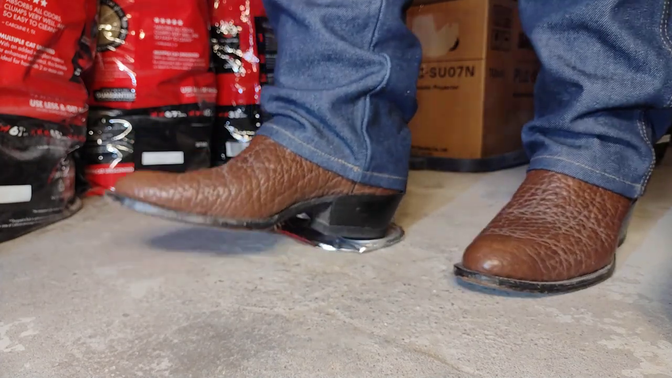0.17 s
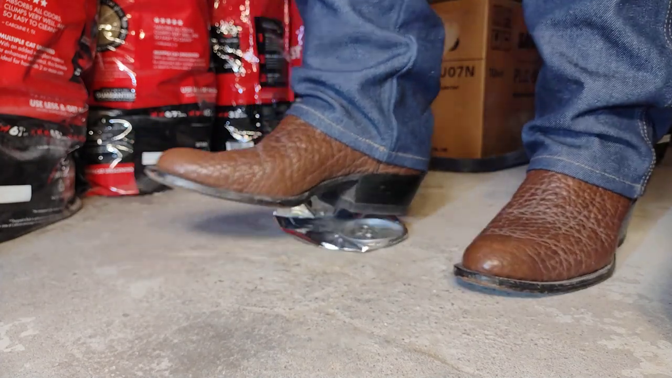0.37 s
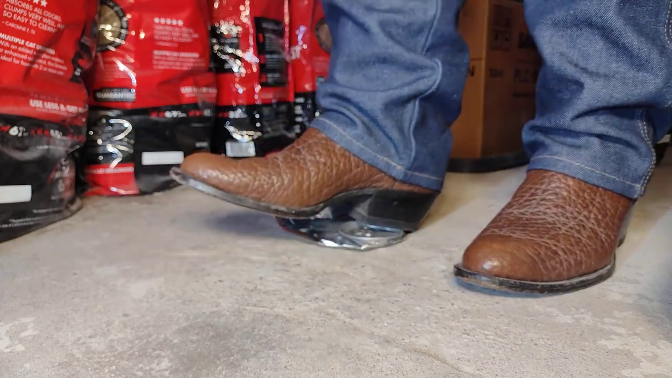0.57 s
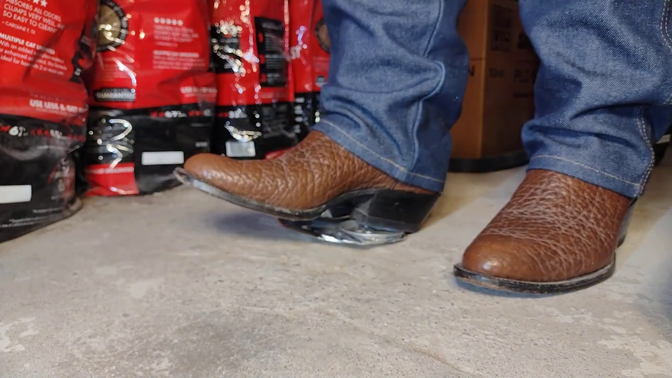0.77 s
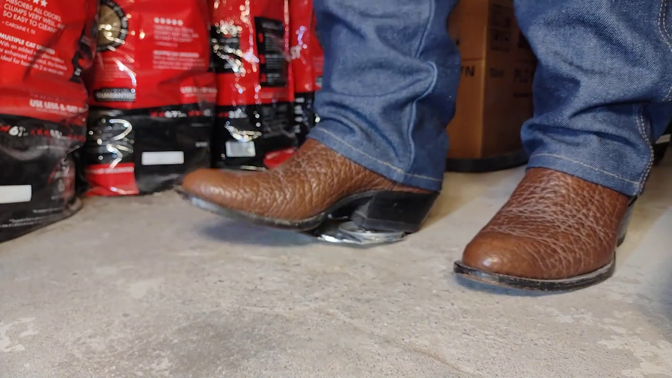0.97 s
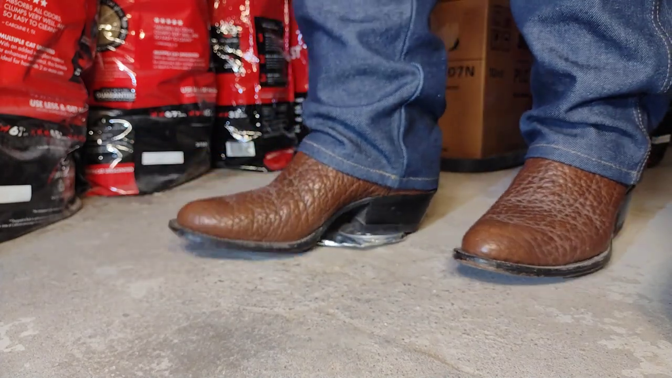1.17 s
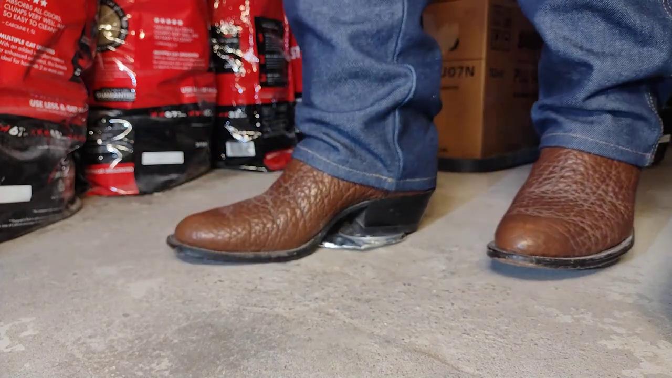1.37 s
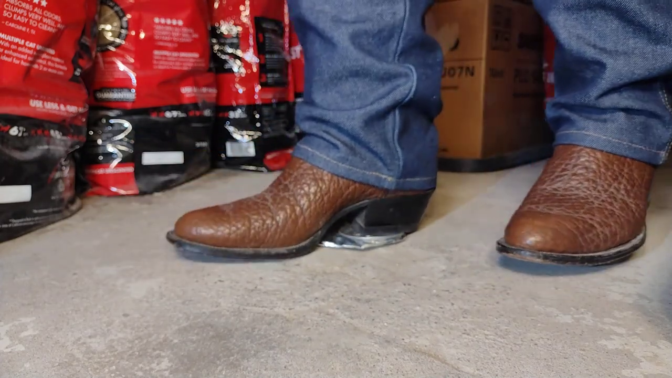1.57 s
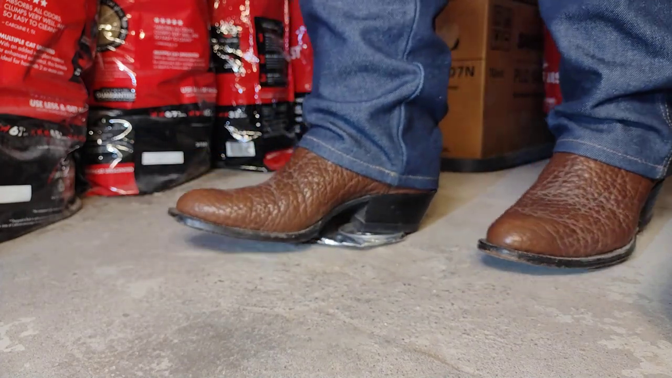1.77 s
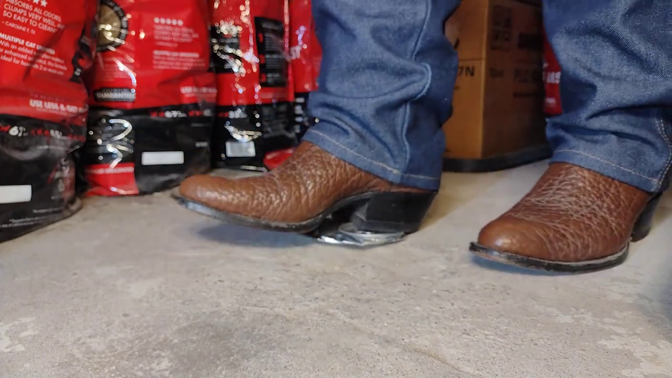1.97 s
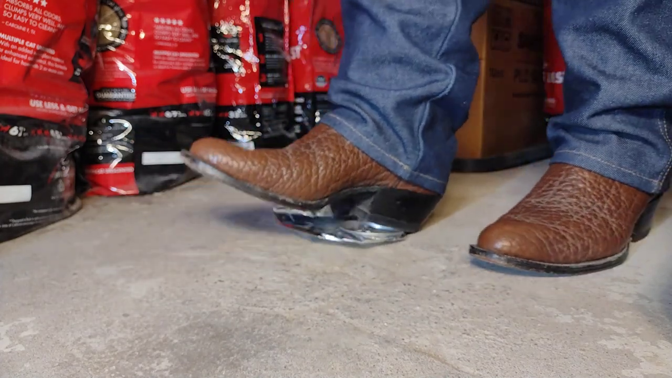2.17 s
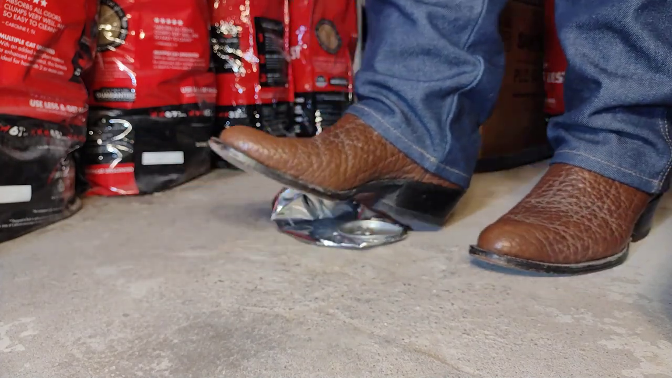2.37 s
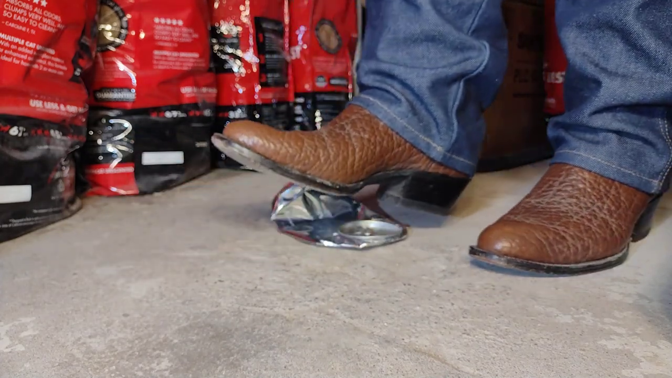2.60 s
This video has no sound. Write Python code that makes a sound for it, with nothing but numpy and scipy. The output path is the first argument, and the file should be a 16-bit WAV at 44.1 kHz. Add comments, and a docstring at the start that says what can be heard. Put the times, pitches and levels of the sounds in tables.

```python
"""A boot heel crushes a thin metal can on a concrete floor, in a small hard-walled room.
Over faint room tone a first buckle cracks, small folds crinkle and the heel bumps dully: shaped noise.
More buckles follow, short noise cracks ringing the crumpled sheet, and the can grinds on the concrete.
From 0.63 s denser bursts come, where panels also pop through with hollow notes: decaying sines.
Crinkle, grinding and bumps swell and fade under and between the bursts; a last faint buckle is at 2.67 s."""
import sys
import numpy as np
from scipy import signal
from scipy.fft import rfft, irfft, next_fast_len
from scipy.io import wavfile
from scipy.ndimage import map_coordinates

SR = 44100
rng = np.random.default_rng(int(sys.argv[2]) if len(sys.argv) > 2 else 0)


def generate_wav(sig):
    """Save sig (samples, or channels by samples) to the path in sys.argv[1] as 16-bit PCM at SR."""
    pcm = np.round(np.clip(np.atleast_2d(sig).T, -1, 1) * 32767).astype(np.int16)
    wavfile.write(sys.argv[1], SR, pcm)


N = 119070
SIZE = 16384  # samples per event
T, F = np.arange(SIZE) / SR, np.fft.rfftfreq(SIZE, 1 / SR)  # s, Hz
CRACK_T60_S = 0.012

# left-right correlation of the direct sound: (frequency [Hz], correlation [-1..1])
DIRECT_CORRELATION = [(510, 0.91), (610, -0.2), (1200, 0.83), (3000, 0.34), (9000, 0.14)]
# left-right correlation of the room sound: (frequency [Hz], correlation [-1..1])
ROOM_CORRELATION = [(150, 0.56), (490, 0.85), (620, 0.37), (1200, 0.29), (9000, -0.34)]


def amp(db):
    """Decibels to gain."""
    return 10 ** (np.asarray(db) / 20)


def along(points, hz):
    """Interpolate (Hz, value) points on a log-frequency axis."""
    point_hz, value = np.transpose(points)
    return np.interp(np.log(hz + 1), np.log(point_hz + 1), value)


def fade(t, t60):
    """Exponential decay, -60 dB at t60."""
    return 1000. ** (-t / t60)


def unit(x):
    """Scale to energy 1, averaged over the channels."""
    return x / np.sqrt(np.mean(np.sum(x ** 2, -1)) + 1e-20)


def flat_power(gain):
    """Scale a gain curve to mean power 1 over frequency."""
    return gain / np.sqrt(np.mean(gain ** 2))


def causal(gain):
    """Minimum-phase response with this gain, by folding the cepstrum."""
    cepstrum = irfft(np.log(np.maximum(gain, 1e-6)))
    cepstrum[1:SIZE // 2] *= 2
    cepstrum[SIZE // 2 + 1:] = 0
    return np.exp(rfft(cepstrum))


def pair(correlation, size=SIZE):
    """Stereo white noise with a given left-right correlation: cos(2 * turn) from mid and side."""
    hz = np.fft.rfftfreq(size, 1 / SR)
    turn = np.arccos(np.clip(along(correlation, hz), -1, 1)) / 2
    spectra = rfft(rng.standard_normal((2, size)))
    mid, side = irfft(spectra * [np.cos(turn), np.sin(turn)], size)
    return np.array([mid + side, mid - side])


def room():
    """Fresh room tail of noise, decaying at a rate set per frequency."""
    # reverberation: (frequency [Hz], t60 [s])
    room_t60 = [(400, 0.16), (2000, 0.17), (15000, 0.165)]
    hz, t, bins = signal.stft(pair(ROOM_CORRELATION), SR, nperseg=256)
    decayed = bins * fade(t, along(room_t60, hz)[:, None])
    tail = signal.istft(decayed, SR, nperseg=256)[1][:, :SIZE]
    return unit(tail * (1 - np.exp(-T / 0.008)))  # 8 ms build-up


def add(out, s, sound):
    """Mix a sound in at time s."""
    i = max(round(s * SR), 0)
    out[:, i:i + SIZE] += sound[..., :N - i]


def can_gain():
    """Broad radiation of the can plus its lasting resonances, at mean power 1."""
    # broad radiation of the sheet: (frequency [Hz], gain [dB])
    sheet = [(25, -56), (70, -33), (190, -30.5), (260, -7.5), (500, -13), (980, -7), (1170, -2.5),
             (1700, -3), (2400, -7.5), (3100, -4), (4500, -10.5), (8000, -16), (13000, -26.5), (16000, -31)]
    # resonances of can and floor: (frequency [Hz], half-power width [Hz], power over the sheet [dB])
    body = [(358.4, 20, 3), (466, 21, 12.5), (521, 37, 15), (586, 38, 4), (716.3, 16.4, 13),
            (1182.5, 28, 7), (1944, 26, 7.5)]
    peaks = sum(amp(db) ** 2 / (1 + (2 * (F - hz) / width) ** 2) for hz, width, db in body)
    return flat_power(amp(along(sheet, F)) * np.sqrt(1 + peaks))


def creases():
    """Random resonances of the sheet in its present shape, at mean power 1."""
    width_hz, depth_db = 110, 3  # each new crease shifts the resonances
    ripple = map_coordinates(rng.standard_normal(SIZE // 2), [F / width_hz])
    return flat_power(amp(depth_db * ripple))


def grains(levels, per_s, colour):
    """Many tiny catches at random moments ring the can and the room."""
    spread_db, room_db = 7, -3.5
    s, db = np.transpose(levels)
    hits = (rng.random(N) < per_s / SR) * rng.choice([-1, 1], N)
    grit = hits * amp(spread_db * rng.standard_normal(N))
    grit = grit / grit.std() * amp(np.interp(np.arange(N) / SR, s, db))
    ring = unit(pair(DIRECT_CORRELATION) * fade(T, CRACK_T60_S)) + amp(room_db) * room()
    answer = unit(irfft(rfft(ring) * causal(can_gain() * amp(along(colour, F)))))
    return signal.fftconvolve(grit[None], answer, axes=1)[:, :N]


def room_tone():
    """Faint steady air of the room: coloured noise."""
    # colour of the air: (frequency [Hz], gain [dB])
    air_colour = [(25, -25.5), (80, 8.5), (200, 0), (600, -8.5), (16000, -11.5)]
    level_db = -64
    hz = np.fft.rfftfreq(N, 1 / SR)
    air = irfft(rfft(pair(ROOM_CORRELATION, size=N)) * amp(along(air_colour, hz)), N)
    return amp(level_db) * air / air.std()


def buckles():
    """Each buckle of the wall cracks, rings briefly under the boot and echoes in the room."""
    # buckles: (time [s], level before all_db [dB], bass, treble, top [dB re level])
    buckle_table = [(0.001, -31, 10.5, 8, -7), (0.225, -24, -8.5, 8, 21.5), (0.269, -21, -1, 9, 15),
                    (0.3, -19.5, 7.5, 8.5, 14.5), (0.312, -17.5, -13, 7.5, 14), (0.339, -17, -6, -4.5, -8),
                    (0.486, -27.5, -3, -9.5, -10), (0.511, -35, 2, -23, -5), (0.546, -32, 1, -13, -3),
                    (0.569, -28, -17, -13, -6), (0.632, -16, -5, -12, -13), (0.64, -10.5, -15.5, -12.5, -9),
                    (0.648, -16, -1.5, -0.5, -9.5), (0.655, -12, -10, -17, -13),
                    (0.678, -11.5, -2, -17, -13.5), (0.699, -18, 3, 0, -24),
                    (0.711, -17.5, -12, -10.5, -13.5), (0.764, -35.5, 13, -19, -5),
                    (0.786, -43.5, 2.5, -8.5, -0.5), (0.861, -42.5, 18.5, -5.5, 0),
                    (0.961, -27, 2.5, -8, -5), (0.973, -12, -12, -1.5, -5), (0.983, -19.5, 2, 11, 14.5),
                    (1.022, -21.5, -8, 11, 13.5), (1.086, -29, -16, -11, -29), (1.13, -23.5, -3, -5, 5.5),
                    (1.145, -26, -32, -2.5, 9), (1.151, -15.5, -13, -15, -36), (1.178, -39, -7, 7.5, 26.5),
                    (1.193, -18, -14, -28, -31), (1.214, -12.5, -11, 4, -10), (1.226, -16, -0.5, 4.5, 6),
                    (1.312, -25.5, -7, -3, -25), (1.324, -19.5, -12.5, -11.5, -34),
                    (1.378, -16, -10.5, 4, 9), (1.402, -28.5, -7, 13.5, 5.5), (1.549, -18, -13.5, -2.5, -9),
                    (1.615, -27.5, 0, 9, -12), (1.677, -15.5, -15.5, 1, -1.5),
                    (1.753, -19.5, -1, 6.5, -2.5), (1.789, -17.5, 6, 2.5, -1), (1.812, -16.5, -13, 4, 5.5),
                    (1.816, -22.5, -4, 13.5, 12), (1.894, -22.5, -2.5, 2, -2),
                    (1.987, -30.5, -11.5, -4.5, -7.5), (2.068, -31, 1.5, -12, -13),
                    (2.088, -19.5, -8, -5.5, -11.5), (2.102, -20.5, -2, -8.5, -14.5),
                    (2.131, -44, 15.5, 20.5, 21.5), (2.149, -18, -7, -5, -10.5), (2.179, -45, -7, 13.5, 22),
                    (2.24, -22, -30, 1.5, -8), (2.269, -28.5, -3.5, -3.5, 1),
                    (2.305, -17.5, -2.5, -5.5, -10), (2.34, -27.5, 4, -5, -12),
                    (2.362, -29, 12.5, -5.5, -4), (2.385, -38.5, 10, 2, 12.5), (2.402, -16.5, -4, -5, -32),
                    (2.417, -33, -16, 3.5, 8), (2.47, -27, -15, -14.5, -30), (2.485, -27.5, -9, -19, -32),
                    (2.557, -49, -20, 5.5, 14), (2.666, -37, -8.5, 1, 7)]
    # bass, reference, treble and top: (frequency [Hz])
    band_hz = [650, 1250, 3400, 9000]
    all_db, ring_db, room_db = 28.5, 4, 0
    rise_tau_s, ring_t60_s = 0.0014, 0.067
    out, can = np.zeros((2, N)), can_gain()
    rise = 1 - np.exp(-T / rise_tau_s)
    for s, db, bass, treble, top in buckle_table:
        crack = unit(pair(DIRECT_CORRELATION) * rise * fade(T, CRACK_T60_S))
        ring = unit(pair(DIRECT_CORRELATION) * rise * fade(T, ring_t60_s))
        colour = list(zip(band_hz, [bass, 0, treble, top]))
        gain = can * amp(along(colour, F))
        blow = crack + amp(ring_db) * ring + amp(room_db) * room()
        snap = unit(irfft(rfft(blow) * causal(gain * creases())))
        colour_rms = np.sqrt(np.mean(gain ** 2))  # strong bands make a louder buckle
        add(out, s, amp(all_db + db) * colour_rms * snap)
    return out


def crinkling():
    """Small folds give way in many fine, bright catches."""
    # (time [s], level [dB])
    crinkle_levels = [(.01, -27), (.11, -65), (.21, -59), (.33, -23), (.45, -49.5), (.68, -55.5), (.8, -78),
                      (.94, -75.5), (1.03, -27), (1.32, -48), (1.52, -83), (1.82, -59), (2.25, -60),
                      (2.41, -40), (2.55, -71)]
    # (frequency [Hz], gain [dB])
    crinkle_colour = [(500, -7), (2000, -4.5), (8000, -0.5)]
    return grains(crinkle_levels, 500, crinkle_colour)  # catches per s


def bumps():
    """The heel meets the floor with a dull push: a noise burst coloured in multiples of a pitch."""
    # (time [s], level [dB], pitch [Hz])
    bump_table = [(.055, -4, 311), (0.298, -24, 306), (1.13, -16, 262), (1.81, -7, 251), (1.979, -16, 230),
                  (2.022, -18, 170)]
    # heel colour: (multiple of the pitch, gain [dB])
    heel_colour = [(.1, -24.5), (.3, -9.5), (1, 2), (1.6, -3), (3, -29.5), (10, -57.5), (50, -75.5)]
    t60_s, room_db = .012, -10.5
    out = np.zeros((2, N))
    for s, db, hz in bump_table:
        heel = causal(amp(along(heel_colour, F / hz)))
        push = unit(rng.standard_normal(SIZE) * fade(T, t60_s))
        bump = irfft(rfft(push + amp(room_db) * room()) * heel)
        add(out, s, amp(db) * unit(bump))
    return out


def grinding():
    """The can grinds on the concrete: dense, dark catches of grit."""
    # (time [s], level [dB])
    grind_levels = [(.2, -82.5), (.36, -32.5), (.58, -33.5), (.62, -61), (.65, -21.5), (.72, -42),
                    (.78, -76), (.92, -93.5), (1.1, -34.5), (1.5, -75), (1.75, -34.5), (2.03, -71),
                    (2.36, -33), (2.5, -39.5), (2.55, -62.5)]
    # (frequency [Hz], gain [dB])
    grit_colour = [(90, 19.5), (250, 9), (400, 2), (700, 6), (1400, 3.5), (3200, -8.5), (7000, -26.5)]
    return grains(grind_levels, 900, grit_colour)  # catches per s


def pops():
    """A panel flips and rings at one note, which starts sharp and settles as the metal relaxes."""
    # (time [s], settled pitch [Hz], level [dB], t60 [s])
    pop_table = [(.635, 1380, -9, 0.078), (.640, 330.6, -15, 0.13), (.655, 1164, -17, 0.066),
                 (.677, 470, -20, 0.055), (.707, 320.5, -21.5, 0.15), (.709, 1207, -6.5, 0.15),
                 (.709, 586, -14, 0.18), (.864, 507.4, -29, 0.13), (.976, 323, -20.5, 0.17),
                 (.981, 514, -14.5, 0.17), (1.024, 532, -26, .26), (1.021, 3095, -17, 0.078),
                 (1.087, 1410, -13.5, 0.023), (1.153, 839, -20.5, 0.15), (1.152, 1280, -5.5, 0.018),
                 (1.194, 1214, -17, 0.085), (1.312, 1380, -17, 0.032), (1.377, 2920, 1.5, 0.016),
                 (1.615, 1228, -10.5, 0.067), (1.618, 928, -20, 0.18), (1.614, 342, -27, 0.086),
                 (1.679, 1455, 2.5, 0.015), (1.753, 1635, -10.5, 0.071), (1.759, 2326, -9, 0.04),
                 (2.089, 272.4, -28.5, 0.28), (2.241, 258, -40, 0.63), (2.339, 543, -20.5, 0.055),
                 (2.363, 248.4, -28.5, 0.49), (2.404, 584, -21, 0.17)]
    # of the pitch; random waver roughens the note, and the bend starts it sharp
    waver_share, bend_share = 0.016, 0.023
    rise_tau_s, settle_tau_s, echo_db = 0.0014, 0.009, -15.0
    out = np.zeros((2, N))
    for s, hz, db, t60 in pop_table:
        waver = waver_share * map_coordinates(rng.standard_normal(SIZE // 2), [T / settle_tau_s * 2])
        bend = bend_share * np.exp(-T / settle_tau_s)
        phase = 2 * np.pi * np.cumsum(hz * (1 + waver + bend)) / SR
        # left-right phase offset gives the correlation at this pitch
        offset = np.arccos(np.clip(along(DIRECT_CORRELATION, hz), -1, 1)) * np.array([[.5], [-.5]])
        note = np.sin(phase + offset) * fade(T, t60) * (1 - np.exp(-T / rise_tau_s))
        echo = signal.fftconvolve(note, room(), axes=1)[:, :SIZE]
        add(out, s, amp(db) * (note + amp(echo_db) * echo))
    return out


def scene():
    """Sum of can, heel and room."""
    return room_tone() + buckles() + crinkling() + bumps() + grinding() + pops()


def record(dry):
    """Round off the highest peaks, then low-pass very steeply."""
    ceiling, top_hz = .95, 16000
    held = dry / (1 + (dry / ceiling) ** 4) ** (1 / 4)
    size = next_fast_len(N + SIZE)
    passed = 1 / np.sqrt(1 + (np.fft.rfftfreq(size, 1 / SR) / top_hz) ** 240)
    return irfft(rfft(held, size) * passed, size)[:, :N]


dry = scene()
out = record(dry)
generate_wav(out)
```